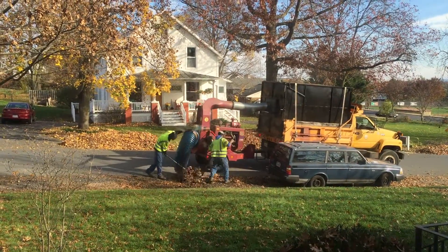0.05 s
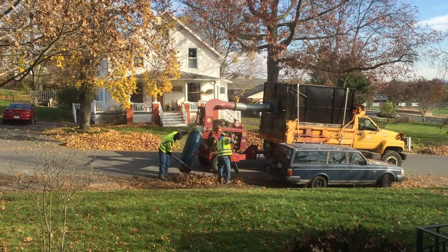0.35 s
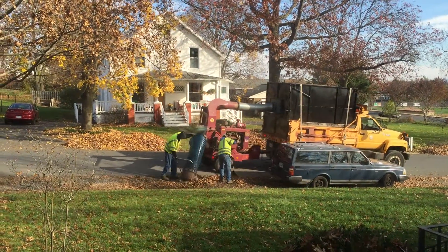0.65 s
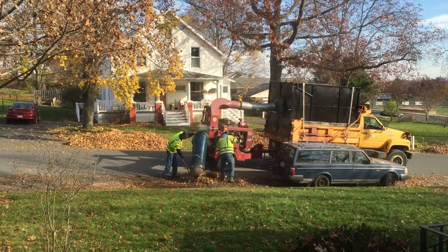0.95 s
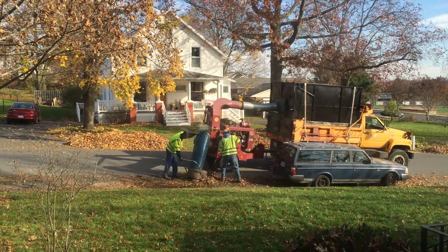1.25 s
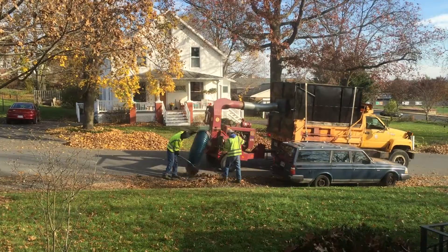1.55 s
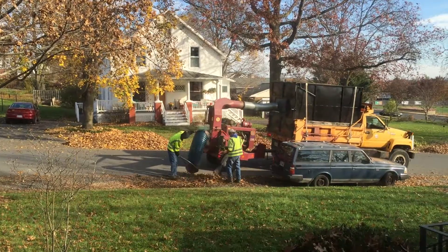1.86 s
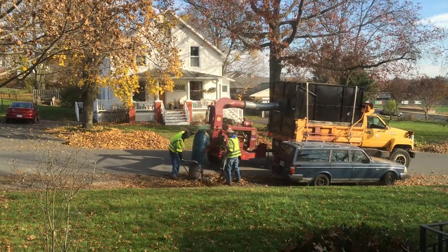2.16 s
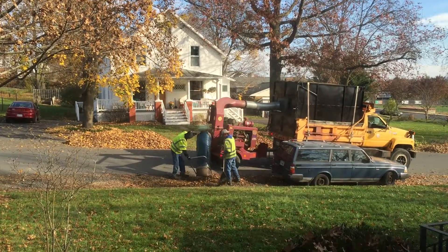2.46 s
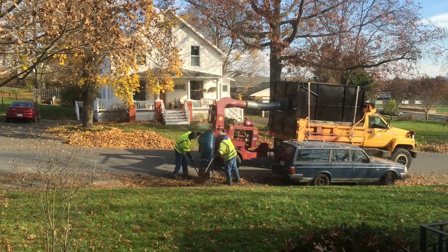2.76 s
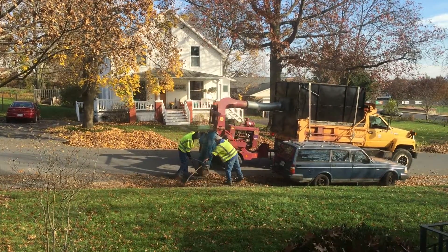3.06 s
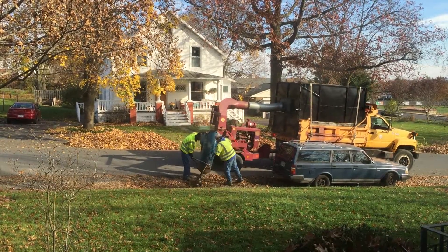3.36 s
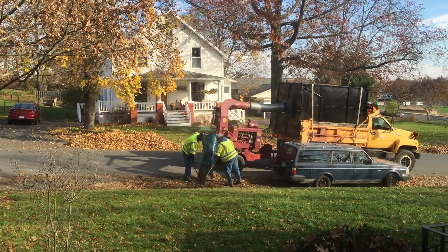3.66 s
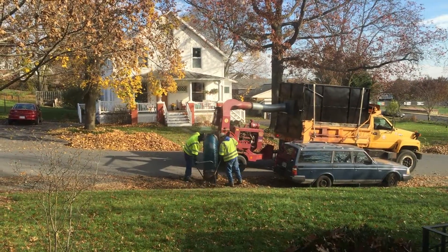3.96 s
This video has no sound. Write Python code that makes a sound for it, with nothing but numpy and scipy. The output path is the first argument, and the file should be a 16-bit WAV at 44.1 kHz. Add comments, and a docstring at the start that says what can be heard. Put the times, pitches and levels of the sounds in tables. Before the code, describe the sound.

A leaf vacuum engine drones and rumbles for all four seconds, with a truck humming beside it and a soft rush of air. Faint rasps of dry leaves, twig knocks in a metal duct and small rattles come and go, thickest around 1.1 to 1.6 seconds and 2.0 to 2.4 seconds. Near 1.4 seconds the engine pitch sags slightly and the hose gives a faint hollow roar.

```python
"""A street: a towed leaf vacuum drones while a truck hums beside it.
A six-cylinder engine turns a four-bladed impeller and sags a little under load.
Its firings rumble in the exhaust and clatter in the block; a loose cover rattles.
Air rushes through the blower and roars in the hose. Clumps of dry leaves rasp up the hose,
twigs knock and grit skids in the steel duct. House fronts and trees add a short echo."""
import sys
import numpy as np
from scipy import signal
from scipy.fft import rfft, irfft, next_fast_len
from scipy.io import wavfile
from scipy.ndimage import uniform_filter1d, map_coordinates

SR = 44100
rng = np.random.default_rng(int(sys.argv[2]) if len(sys.argv) > 2 else 0)


def unload_wav(signal):
    """Save mono or channel-first audio to the path in sys.argv[1] as 16-bit WAV at rate SR, clipped to [-1, 1]."""
    wavfile.write(
        sys.argv[1],
        SR,
        np.round(np.clip(np.atleast_2d(signal).T, -1, 1) * 32767).astype(np.int16),
    )


N = 176400
TIME_S = np.arange(N) / SR
CYLINDERS, BLADES, PULLEY_RATIO = 6, 4, 7.17


def amp(db):
    """Decibels to gain."""
    return 10 ** (np.asarray(db) / 20)


def unit(x):
    """Scale to rms 1."""
    return x / np.sqrt(np.mean(x ** 2) + 1e-20)


def curve(points):
    """(time [s], value) points to one value per sample."""
    return np.interp(TIME_S, *np.transpose(points))


def wobble(rate_hz):
    """Smooth random curve, rate_hz knots per second."""
    coarse_s = TIME_S[::64]
    spline = map_coordinates(rng.standard_normal(400), [coarse_s * rate_hz], mode="mirror")
    return np.interp(TIME_S, coarse_s, spline)


def filtered(x, response):
    """Apply a frequency response, given as a function of Hz."""
    size = next_fast_len(N + SR // 2)
    return irfft(rfft(x, size) * response(np.fft.rfftfreq(size, 1 / SR)), size)[:N]


def coloured(x, spectrum):
    """Shape x by (frequency [Hz], gain [dB]) points; rms 1."""
    points_hz, db = np.transpose(spectrum)
    return unit(filtered(x, lambda hz: amp(np.interp(np.log(hz + 1), np.log(points_hz), db))))


def resonated(x, modes):
    """Parallel (centre [Hz], width [Hz], gain [dB]) resonators of alternating sign; rms 1."""
    def response(hz):
        return sum((-1) ** k * amp(db) * 1j * hz * width_hz / (centre_hz**2 - hz**2 + 1j * hz * width_hz)
                   for k, (centre_hz, width_hz, db) in enumerate(modes))
    return unit(filtered(x, response))


def tone(turns, rms_db):
    """Sine with a random starting phase."""
    return np.sqrt(2) * amp(rms_db) * np.sin(2 * np.pi * (turns + rng.random()))


def swell(start_s, attack_s, hold_s, decay_s):
    """Linear rise; exponential decay from hold_s after the start."""
    age_s = TIME_S - start_s
    return np.clip(age_s / attack_s, 0, 1) * np.exp(-np.maximum(age_s - hold_s, 0) / decay_s)


def street(x, t60_s=0.56, echo_db=-7):
    """House fronts and trees add a short scattered echo."""
    t = np.arange(SR // 2) / SR
    tail = rng.standard_normal(len(t)) * np.exp(-np.log(1000) * t / t60_s)
    return x + amp(echo_db) * signal.fftconvolve(x, tail / np.linalg.norm(tail))[:N]


def truck(pitch_hz=237.2):
    """The truck hums at one pitch, swelling and fading."""
    # hum (time [s], level [dB])
    hum_db = [(0, -46.5), (.55, -56.5), (.7, -46), (1.4, -51.5), (1.65, -42.5), (1.9, -60.5), (2.1, -58.5),
              (2.28, -40.5), (2.5, -46), (3.05, -42), (3.35, -48.5), (3.9, -44)]
    return tone(pitch_hz * TIME_S, curve(hum_db))


def whines(drift_turns=0.14, waver_db=1.5, flutter_db=3.5):
    """Thin machinery whines flutter faintly."""
    # whines (frequency [Hz], level [dB])
    partials = [(412, -72.5), (523, -74.5), (602, -79), (1031, -83)]
    return sum(tone(hz * TIME_S + drift_turns * wobble(14),
                    db + waver_db * wobble(4.6) + flutter_db * wobble(30)) for hz, db in partials)


def whistle(level_db=-85.5):
    """Air whistles faintly past the blower's edges."""
    # whistle bands (centre [Hz], width [Hz], gain [dB])
    bands = [(3584, 6.4, 0.5), (3870, 53, -7.5)]
    return amp(level_db) * resonated(rng.standard_normal(N), bands)


def air(level_db=-64.5, patch_db=0.97, waver_db=0.63):
    """Air rushes through the blower, its gain drifting in patches of time and frequency."""
    # rush spectrum (frequency [Hz], gain [dB])
    spectrum = [(100, -7.5), (350, 2.5), (520, -2.5), (660, -8.5), (1300, -12.5), (2000, -14.5),
                (2900, -21), (3400, -19), (3950, -17.5), (4500, -20.5), (4900, -24), (5600, -21.5),
                (7500, -28.5), (9300, -28), (10100, -31), (10500, -35), (11100, -30.5), (15600, -33)]
    noise_stft = signal.stft(rng.standard_normal(N), nperseg=512)[2]
    patches = uniform_filter1d(rng.standard_normal(noise_stft.shape), size=6, axis=0)
    patches = unit(uniform_filter1d(patches, size=14, axis=1))
    rush = signal.istft(noise_stft * amp(patch_db * patches), nperseg=512)[1][:N]
    return amp(level_db + waver_db * wobble(5.9)) * coloured(rush, spectrum)


def hose():
    """The hose's air column roars hollowly under load."""
    # roar (time [s], level [dB])
    roar_db = [(0, -86), (1.15, -79.5), (1.4, -58.5), (1.7, -66), (2.4, -68), (3.1, -67.5), (3.5, -78)]
    # air column modes (centre [Hz], width [Hz], gain [dB])
    modes = [(415, 17, 4.5), (440, 30, 2.5), (477, 11, 2), (530, 26, -4.5)]
    return amp(curve(roar_db)) * resonated(rng.standard_normal(N), modes)


def housing():
    """The impeller housing resonates under load."""
    # resonance (time [s], level [dB])
    ring_db = [(0, -67), (.85, -71.5), (1.1, -76), (1.4, -67), (1.8, -80.5), (2.25, -62.5), (2.5, -83),
               (3.1, -67.5), (3.5, -86)]
    # housing modes (centre [Hz], width [Hz], gain [dB])
    modes = [(594, 18, 5), (626.6, 47, -2), (778, 37, -5)]
    return amp(curve(ring_db)) * resonated(rng.standard_normal(N), modes)


def cover():
    """A loose sheet-metal engine cover buzzes now and then."""
    # cover modes (centre [Hz], width [Hz], gain [dB])
    modes = [(964, 40, -2.5), (1027, 40, -0.5), (1136, 43, -12)]
    # rattles (time [s], level [dB])
    rattles = [(0.04, -66), (.69, -66.5), (1.15, -65), (1.458, -67), (1.505, -65), (2.41, -63.5),
               (2.798, -63), (2.975, -68), (3.319, -70), (3.434, -66.5), (3.575, -66.5), (3.96, -63)]
    envelope = sum(amp(db) * swell(start_s, attack_s=0.0043, hold_s=0.024, decay_s=0.013)
                   for start_s, db in rattles)
    return envelope * resonated(rng.standard_normal(N), modes)


def grit(chatter_turns=0.09):
    """Grit skids along the steel with a short, chattering ring."""
    # skids (time [s], pitch [Hz], hold [s], level [dB])
    skids = [(1.318, 4150, 0.035, -73), (1.346, 3680, 0.023, -68), (1.517, 3980, 0.027, -75),
             (2.345, 4520, 0.015, -70), (2.38, 3750, 0.016, -68), (3.207, 4020, .009, -69),
             (3.645, 3480, 0.015, -72.5)]
    return sum(swell(start_s, attack_s=0.0063, hold_s=hold_s, decay_s=0.005)
               * tone(hz * TIME_S + chatter_turns * wobble(300), db) for start_s, hz, hold_s, db in skids)


def knock(start_s, pitch_hz, level_db, scatter_db=1.1, detune=0.008):
    """One strike on the steel duct; each mode rings with random strength and detuning."""
    # duct modes (frequency / pitch [ratio], gain [dB])
    modes = [(1, -3), (1.09, -16.5), (1.22, -15.5), (1.68, -17)]
    t = TIME_S[:SR // 8]
    ring = np.zeros(len(t))
    for ratio, db in modes:
        gain = amp(db + scatter_db * rng.standard_normal())
        mode_hz = pitch_hz * ratio * (1 + detune * rng.standard_normal())
        ring += gain * tone(mode_hz * t, level_db)
    ring *= swell(0, attack_s=0.0057, hold_s=0.011, decay_s=0.011)[:len(t)]
    return np.pad(ring, (round(start_s * SR), N))[:N]


def debris(bit_count=16, bit_hz=1386, bit_db=-70):
    """Twigs knock in the duct, pitched by where they strike; smaller bits tap at random."""
    # twig strikes (time [s], pitch [Hz], level [dB])
    twigs = [(.152, 1366, -64), (.555, 1397, -64.5), (0.834, 1376, -65), (1.138, 1402, -63),
             (1.322, 2360, -69.5), (1.449, 1380, -62.5), (1.552, 1450, -59.5), (2.033, 1400, -62),
             (2.097, 1370, -60.5), (2.187, 2210, -66), (2.194, 1936, -62.5), (2.211, 1370, -58.5),
             (2.252, 1625, -61), (2.272, 1436, -61), (2.323, 1364, -58.5), (2.903, 1410, -69),
             (3.018, 1440, -62.5), (3.153, 1426, -65.5), (3.617, 1405, -69)]
    bits = [(start_s, bit_hz, bit_db) for start_s in rng.random(bit_count) * N / SR]
    return sum(knock(*strike) for strike in twigs + bits)


def leaves(cracks_per_s=4400, scatter_db=1, pipe_share=0.16):
    """Each clump going up the hose is a swell of tiny dry cracks that also ring the steel pipe."""
    # clumps (time [s], hold [s], level [dB], treble tilt [dB/octave])
    clumps = [(0.101, 0.028, -76, 7), (0.449, 0.016, -72.5, -2), (0.602, 0.033, -73.5, 1),
              (1.096, 0.055, -71.5, -3), (1.313, 0.065, -69, 2.5), (1.398, 0.066, -75, -5),
              (1.502, 0.022, -66, 1), (2.128, .05, -72, -0.5), (2.196, 0.081, -68.5, -4.5),
              (2.312, 0.058, -69.5, .5), (3.621, 0.025, -70, 2)]
    # rasp spectrum (frequency [Hz], gain [dB])
    spectrum = [(500, -25.5), (1500, 3.5), (2300, -5), (3000, -4), (3600, 1), (4300, -2), (4900, -3),
                (5700, -1.5), (7000, -12.5), (9000, -16.5), (11000, -27)]
    # pipe modes (centre [Hz], width [Hz], gain [dB])
    modes = [(3670, 63, 4.5), (4080, 57, 10), (4470, 97, 1.5), (5730, 120, 1)]
    cracks = (rng.random(N) < cracks_per_s / SR) * rng.choice([-1, 1], N)
    cracks = cracks * amp(scatter_db * rng.standard_normal(N))
    rasp = np.sqrt(1 - pipe_share) * coloured(cracks, spectrum)
    rasp += np.sqrt(pipe_share) * resonated(cracks, modes)
    sound = np.zeros(N)
    for start_s, hold_s, db, tilt_db in clumps:
        tilted = unit(filtered(rasp, lambda hz: amp(tilt_db * np.log2(hz + 500))))
        sound += amp(db) * swell(start_s, attack_s=0.005, hold_s=hold_s, decay_s=0.039) * tilted
    return sound


def firings(shaft_turns, strengths):
    """One pulse per firing; each cylinder fires once in two turns."""
    onsets = np.flatnonzero(np.diff(np.floor(shaft_turns * CYLINDERS / 2)) > 0)
    pulses = np.zeros(N)
    pulses[onsets] = strengths[:len(onsets)]
    return pulses


def clatter(shaft_turns, level_db=-70.5, decay_s=0.0078, scatter_db=3.5, waver_db=0.76):
    """Each firing shakes the engine block with a short noise burst."""
    # block modes (centre [Hz], width [Hz], gain [dB])
    modes = [(787, 23, -9.5), (961, 35, -1), (1032, 30, 3), (1158, 90, -3.5), (1375, 82, -4.5),
             (1446, 44, -3.5), (1620, 50, -6.5)]
    pulses = firings(shaft_turns, amp(scatter_db * rng.standard_normal(N)))
    envelope = signal.lfilter([1], [1, -np.exp(-1 / (decay_s * SR))], pulses)
    return amp(level_db + waver_db * wobble(12)) * resonated(envelope * rng.standard_normal(N), modes)


def exhaust(shaft_turns, level_db=-43, pulse_share=0.49):
    """Uneven firings and turbulent gas rumble through the muffler."""
    # rumble spectrum (frequency [Hz], gain [dB])
    spectrum = [(31, -30), (40, -6.5), (52, -7.5), (72, -6), (95, -0.5), (128, -4), (165, 0.5), (200, -2),
                (235, 2.5), (280, -5), (315, -9.5), (350, -19), (450, -30.5), (700, -46.5), (1500, -69)]
    pulses = unit(firings(shaft_turns, rng.standard_normal(N)))
    gas = np.sqrt(pulse_share) * pulses + np.sqrt(1 - pulse_share) * rng.standard_normal(N)
    return amp(level_db) * coloured(gas, spectrum)


def drone(shaft_turns, flutter_db=2, waver_db=1.5):
    """Tones locked to the shaft: firing, belt-driven pulley, impeller blades, weaker engine orders."""
    # firing tone (time [s], level [dB])
    firing_db = [(0, -37), (.3, -33.5), (.85, -36.5), (.97, -39), (1.08, -35.5), (1.3, -42), (1.47, -41.5),
                 (1.6, -40), (2.45, -38.5), (2.6, -36), (2.92, -42), (3.08, -37.5), (3.55, -42), (4, -40.5)]
    # pulley tone (time [s], level [dB])
    pulley_db = [(.5, -43), (1.2, -51.5), (1.6, -58), (4, -54.5)]
    # blade tone (time [s], level [dB])
    blade_db = [(0, -35.5), (.25, -47.5), (.52, -47.5), (.85, -43), (1.05, -65), (1.28, -49), (1.45, -43),
                (1.68, -38.5), (1.9, -41), (2.35, -40.5), (2.7, -49), (3.25, -39.5), (4, -44.5)]
    # blade tone's octave (time [s], level [dB])
    octave_db = [(0, -58), (.3, -45.5), (.7, -49.5), (1, -50), (1.25, -41.5), (1.52, -59.5), (1.7, -46),
                 (2, -57), (2.4, -43), (2.8, -45), (3.15, -53.5), (3.55, -54.5), (3.95, -45.5)]
    # engine orders (frequency / shaft speed [ratio], level [dB])
    orders = [(2, -52.5), (2.5, -54.5), (5, -60), (5.5, -53), (6, -53), (12, -72), (13, -79), (16.5, -80.5)]
    firing = tone(shaft_turns * CYLINDERS / 2, curve(firing_db))
    pulley = tone(shaft_turns * PULLEY_RATIO, curve(pulley_db))
    blade = tone(shaft_turns * BLADES, curve(blade_db))
    octave = tone(2 * shaft_turns * BLADES, curve(octave_db) + flutter_db * wobble(20))
    weak_tones = sum(tone(order * shaft_turns, db - waver_db * wobble(4.4)) for order, db in orders)
    return firing + pulley + blade + octave + weak_tones


def scene(jitter_turns=0.002):
    """Vacuum, truck and hose load in mono; one shaft times drone, exhaust and clatter."""
    # shaft (time [s], speed [turns/s])
    speed = [(0, 37.4), (.4, 37.65), (1, 37.35), (1.35, 37.1), (1.5, 36.45), (2.4, 36.45), (3.3, 36.65),
             (4, 36.95)]
    shaft_turns = np.cumsum(curve(speed)) / SR + jitter_turns * wobble(14)
    machines = drone(shaft_turns) + exhaust(shaft_turns) + whines() + truck()
    airflow = air() + whistle() + hose() + housing()
    mix = machines + airflow + grit() + street(clatter(shaft_turns) + cover() + leaves() + debris())
    return mix[None]


def record(dry, fade_s=0.004, cutoff_hz=15700):
    """Fade both ends, then brick-wall low-pass."""
    edge_s = np.minimum(TIME_S, TIME_S[::-1])
    fade = np.sin(np.pi / 2 * np.minimum(edge_s / fade_s, 1)) ** 2
    return filtered(dry[0] * fade, lambda hz: hz < cutoff_hz)[None]


dry = scene()
out = record(dry)
unload_wav(out)
```